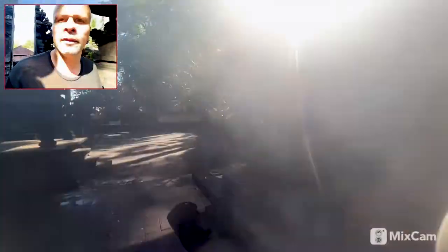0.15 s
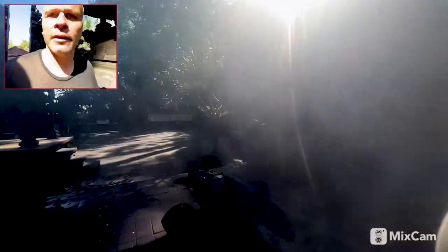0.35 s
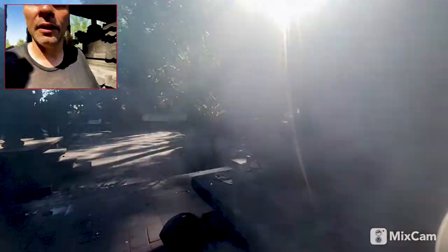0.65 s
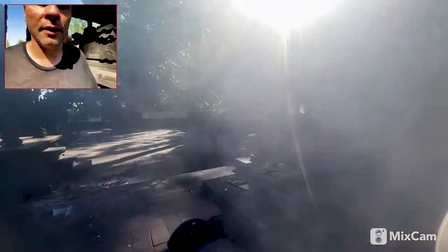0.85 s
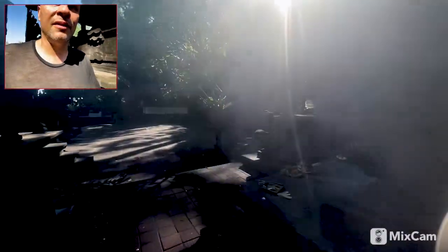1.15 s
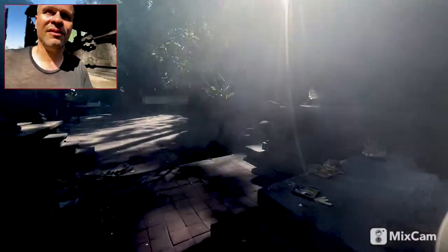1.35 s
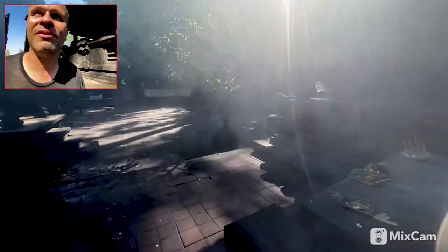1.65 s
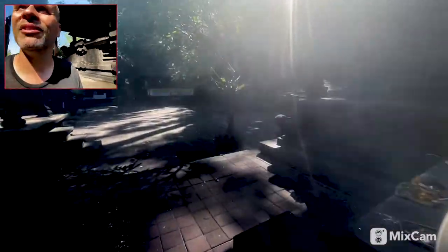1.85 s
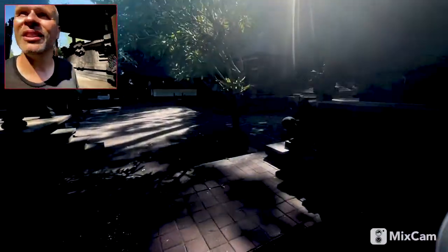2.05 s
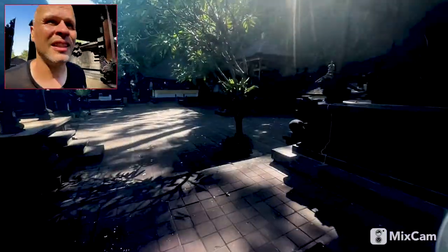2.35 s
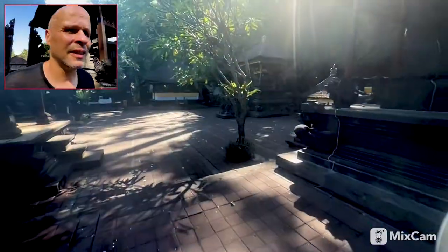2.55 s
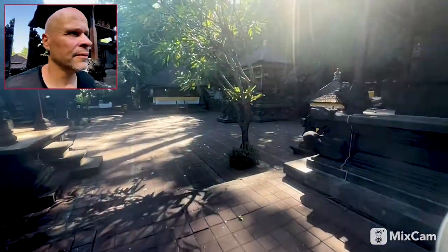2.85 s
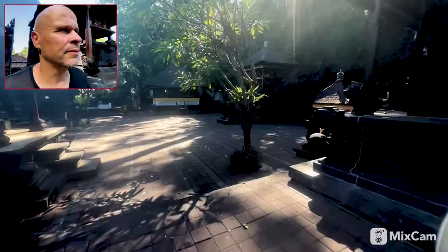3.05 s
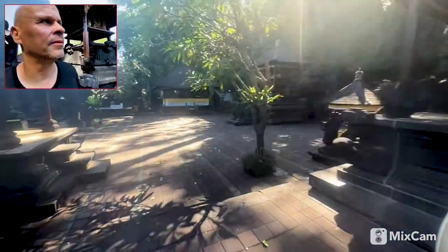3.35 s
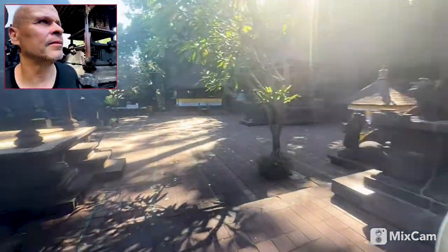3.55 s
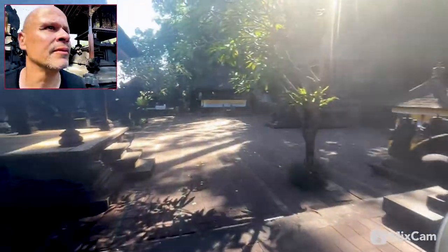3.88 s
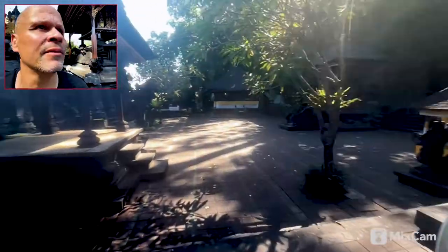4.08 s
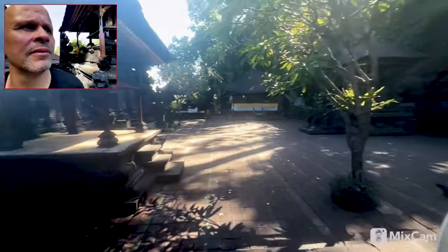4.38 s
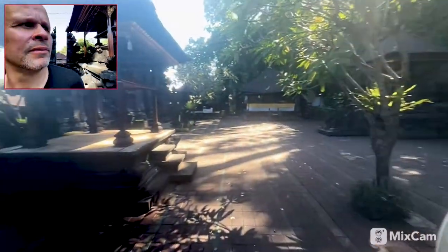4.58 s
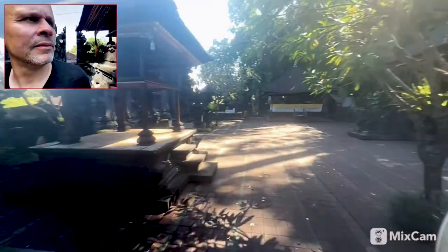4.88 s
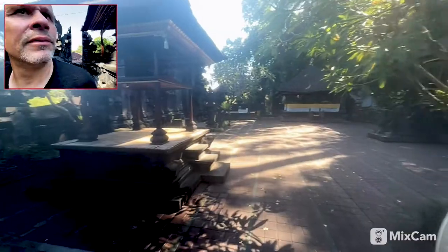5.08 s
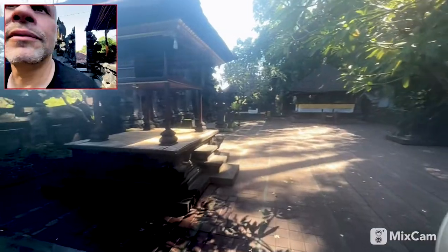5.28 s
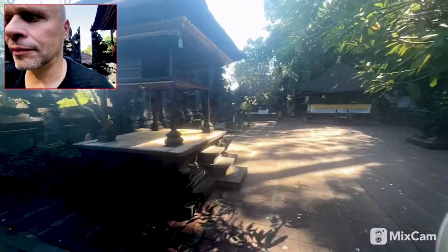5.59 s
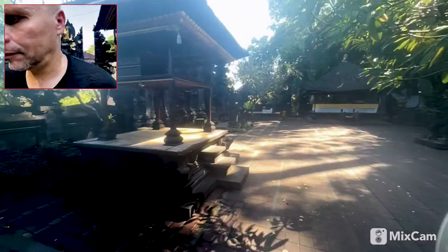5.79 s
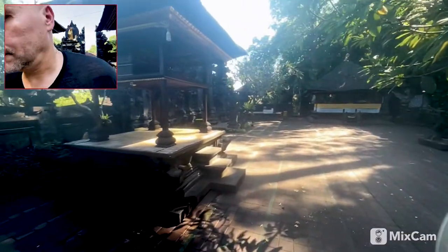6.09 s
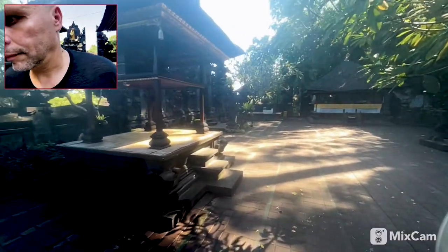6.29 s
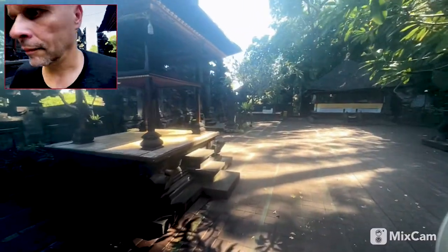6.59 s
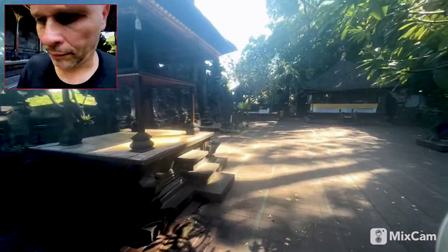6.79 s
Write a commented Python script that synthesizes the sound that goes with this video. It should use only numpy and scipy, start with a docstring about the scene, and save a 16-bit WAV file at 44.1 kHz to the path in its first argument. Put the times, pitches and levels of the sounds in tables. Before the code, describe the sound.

A large bat colony chirrs without pause inside a cave, heard in mono from the courtyard outside as a thin, shrill hiss. Small clusters of sliding squeaks stand out first, then harsh little screeches come more and more often as the colony swells, ringing briefly against the rock. A low wash of distant traffic lies below, with a faint motor drifting in and out and a far engine that drops to idle late on.

```python
"""A cave mouth beside a stone courtyard: thousands of tiny bat calls merge into a high sizzle. Nearer bats
squeak in gliding whistles and screech with a rasp, and the rock answers. A faint ringing whistle dies away at
the start. Over the rumble and wash of far traffic, a distant engine hums, then slows to idle, and a faint
higher drone swells in and out. Mono."""
import sys
import numpy as np
from scipy import signal
from scipy.fft import rfft, irfft, next_fast_len
from scipy.io import wavfile
from scipy.ndimage import map_coordinates

SR = 44100
rng = np.random.default_rng(int(sys.argv[2]) if len(sys.argv) > 2 else 0)


def file_out(sig):
    """Save sig as 16-bit WAV at sys.argv[1]."""
    # one column per channel
    cols = np.atleast_2d(sig).T
    # limit, then scale
    lim = np.clip(cols, -1, 1)
    pcm = np.round(lim * 32767).astype(np.int16)
    wavfile.write(sys.argv[1], SR, pcm)


N = 305613
TIME_S = np.arange(N) / SR


def amp(db):
    """Decibels to gain."""
    return 10 ** (np.asarray(db) / 20)


def unit(x):
    """Scale to rms 1."""
    return x / np.sqrt(np.mean(x ** 2) + 1e-20)


def at_hz(points, hz):
    """Interpolate (f/Hz, value) points on a log axis."""
    f, values = np.transpose(points)
    return np.interp(np.log(hz + 1), np.log(f + 1), values)


def curve(points):
    """Interpolate (t/s, value) points at every sample."""
    return np.interp(TIME_S, *np.transpose(points))


def wobble(knots_per_s, size=N):
    """Smooth random curve, rms near 1."""
    knots = rng.standard_normal(int(size * knots_per_s / SR) + 4)
    return map_coordinates(knots, [np.arange(size) * knots_per_s / SR])


def filtered(x, response):
    """Zero-phase filter with gain response(hz)."""
    size = next_fast_len(N + SR // 2)
    return irfft(rfft(x, size) * response(np.fft.rfftfreq(size, 1 / SR)), size)[:N]


def coloured(x, spectrum):
    """Shape x by (f/Hz, level/dB) points; rms 1."""
    return unit(filtered(x, lambda hz: amp(at_hz(spectrum, hz))))


def add(track, start_s, sound):
    """Mix a sound into a track."""
    part = track[max(0, round(start_s * SR)):][:len(sound)]
    part += sound[:len(part)]


def sine(hz):
    """Tone following a pitch curve."""
    return np.sin(2 * np.pi * np.cumsum(hz, axis=-1) / SR)


def call_envelope(length_s):
    """Flat top, cosine edges."""
    return signal.windows.tukey(round(length_s * SR), .45)


# Low traffic spectrum: f/Hz, relative level/dB
RUMBLE_SPECTRUM = [(20, -24), (30, -13), (40, 2.5), (60, 6.5), (90, 1.5), (125, -0.5), (200, -4.5),
                   (255, -5.5), (300, -4.5), (450, -10), (700, -19), (1500, -34)]
# Mid and high traffic spectrum: f/Hz, relative level/dB
WASH_SPECTRUM = [(250, -48), (550, 0), (900, 0.5), (1400, -1), (1700, -3), (2500, -3.5), (3300, -9.5),
                 (5000, -10), (9000, -10.5)]
def traffic(rumble_db=-43.5, wash_db=-48):
    """Far traffic: low rumble and a soft wash."""
    rumble = amp(rumble_db + 0.61 * wobble(5.5)) * coloured(rng.standard_normal(N), RUMBLE_SPECTRUM)
    wash = amp(wash_db) * coloured(rng.standard_normal(N), WASH_SPECTRUM)
    return rumble + wash


# Swells of the higher drone: t/s, peak level/dB
DRONE_SWELLS = [(1.35, -54.5), (2.28, -61), (3.45, -53.5)]
def drone(pitch_hz=290.7, floor_db=-63, half_width_s=0.22):
    """A faint wavering drone note comes and goes on the air."""
    swells = sum(amp(db) * np.exp(-((TIME_S - s) / half_width_s) ** 2) for s, db in DRONE_SWELLS)
    flutter = amp(1.9 * wobble(9))
    hz = pitch_hz * (1 + 0.0138 * wobble(30))
    return (amp(floor_db) + swells) * flutter * unit(sine(hz))


def background(dip_db=4.5, hold_s=0.43, rise_s=0.43):
    """The drone and traffic start quieter, then come up."""
    db = -dip_db * np.exp(-np.maximum(TIME_S - hold_s, 0) / rise_s)
    return amp(db) * (drone() + traffic())


# Engine loudness: t/s, level/dB
ENGINE_LEVEL = [(.45, -52), (.7, -44), (1.08, -36), (1.3, -36), (1.45, -41.5), (2.85, -43), (3.05, -38.5),
                (4.9, -40), (5.6, -46.5), (6.93, -45.5)]
# Exhaust orders: multiple of firing rate, relative level/dB
EXHAUST_ORDERS = [(1, 6.5), (1.5, -25), (2, -18), (3, -27.5)]
def engine(cruise_hz=79.47, creep_hz_per_s=0.62, idle_hz=61.6, ease_at_s=5.03, run_down_s=0.2943):
    """Cruises, then sinks to idle as the throttle closes; only low exhaust orders carry this far."""
    throttle = np.exp(-np.maximum(TIME_S - ease_at_s, 0) / run_down_s)
    loaded_hz = cruise_hz + creep_hz_per_s * TIME_S
    firing_hz = (idle_hz + throttle * (loaded_hz - idle_hz)) * (1 + 0.011 * wobble(14))
    exhaust = sum(amp(db + 1.8 * wobble(11)) * sine(order * firing_hz) for order, db in EXHAUST_ORDERS)
    return amp(curve(ENGINE_LEVEL)) * unit(exhaust)


# Whistle tones: f/Hz, relative level/dB
WHISTLE_TONES = [(2783, -11), (3085, -7), (3144, -7), (3768, -16)]
def whistle(level_db=-57, hold_s=0.14, fall_db_per_s=70):
    """A cluster of fluttering high tones holds briefly, then dies away."""
    envelope = amp(level_db - fall_db_per_s * np.maximum(TIME_S - hold_s, 0))
    tones = sum(amp(db + 1.7 * wobble(49)) * sine(hz + 18 * wobble(91)) for hz, db in WHISTLE_TONES)
    return envelope * unit(tones)


# Cave mouth decay: f/Hz, T60/s
CAVE_T60 = [(2000, 0.29), (7000, 0.39), (15000, 0.069)]
def cave_reverb(x, wet_db):
    """The rock adds a diffuse tail, shortest in the top treble."""
    hz, t, noise = signal.stft(rng.standard_normal(SR // 2), SR, nperseg=256)
    decay = amp(-60 * t / at_hz(CAVE_T60, hz)[:, None])
    _, tail = signal.istft(noise * decay, SR, nperseg=256)
    echo = signal.fftconvolve(x, tail / np.linalg.norm(tail))[:N]
    return (x + amp(wet_db) * echo) / np.hypot(1, amp(wet_db))


# Clear calls: t/s, length/s, start f/Hz, end f/Hz, level/dB
SQUEAK_CALLS = [ (0.585, 0.058, 4020, 2950, -51.5), (0.638, .055, 4130, 3710, -52.5),
                (1.197, .09, 7250, 6900, -55), (1.199, 0.048, 4850, 4500, -50.5),
                (1.26, .05, 5950, 5750, -53), (1.402, .064, 5220, 2315, -50), (1.438, .04, 4850, 4070, -48),
                (1.461, 0.04, 3100, 5000, -50), (1.598, .04, 7170, 3750, -43),
                (1.627, 0.032, 6700, 5100, -48), (2.578, .058, 4500, 4180, -56),
                (3.194, .1, 7150, 6590, -45), (3.203, 0.028, 8500, 8350, -47),
                (3.26, .048, 7700, 7550, -51), (3.424, 0.038, 4150, 3850, -42),
                (3.452, 0.031, 3350, 2750, -47.5), (3.485, .03, 3900, 4200, -42),
                (3.506, .025, 3470, 2800, -49), (4.78, .08, 4230, 3770, -56),
                (5.165, 0.071, 6040, 6150, -45), (5.285, 0.037, 7330, 7050, -42),
                (5.804, 0.065, 9400, 9100, -42), (5.8, .08, 5660, 5270, -52), (6.137, .02, 6150, 6120, -46),
                (6.685, .03, 2520, 2400, -55)]
def squeaks(glide_bend=1.7, quiver_hz=91, scratch_hz=229):
    """Near bats whistle: the pitch holds, then slides, with a scratchy quiver and a weak octave."""
    track = np.zeros(N)
    for start_s, length_s, start_hz, end_hz, db in SQUEAK_CALLS:
        envelope = call_envelope(length_s)
        size = len(envelope)
        age = np.linspace(0, 1, size)
        glide_hz = start_hz * (end_hz / start_hz) ** (age ** glide_bend)
        hz = glide_hz + quiver_hz * wobble(196.5, size) + scratch_hz * wobble(1816, size)
        flutter = amp(1.3 * wobble(320, size))
        voice = flutter * (sine(hz) + amp(-9) * sine(2 * hz))
        add(track, start_s, amp(db) * envelope * unit(voice))
    return cave_reverb(track, wet_db=-7)


# Harsh calls: t/s, length/s, f/Hz, fundamental level/dB, octave level/dB
SCREECH_CALLS = [ (1.17, 0.11, 6470, -53, -40), (3.188, 0.15, 7000, -50, -35.5),
                 (3.382, .15, 6670, -51, -32), (4.501, .08, 6600, -53, -31.5),
                 (4.673, 0.098, 6540, -51, -31.5), (5.278, .11, 6680, -49.5, -30.5),
                 (5.623, 0.051, 6220, -48, -31), (5.745, 0.052, 6450, -43, -27),
                 (5.805, .058, 6370, -47, -30), (5.892, 0.038, 6630, -50, -27),
                 (5.95, .036, 6650, -47, -27), (6.059, 0.033, 6650, -55, -22),
                 (6.133, .07, 6140, -55, -24.5), (6.191, 0.045, 6600, -51, -24),
                 (6.31, 0.051, 7350, -37.5, -37), (6.313, .063, 6130, -60, -24.5),
                 (6.46, .075, 6470, -67, -29), (6.473, 0.043, 8100, -39, -46),
                 (6.543, .024, 7100, -50, -27), (6.632, 0.031, 7050, -41.5, -31),
                 (6.842, 0.06, 8730, -41, -55)]
def screeches():
    """Squabbling bats: jittering pitch and a rasp, mostly strongest at the octave."""
    track = np.zeros(N)
    for start_s, length_s, pitch_hz, fundamental_db, octave_db in SCREECH_CALLS:
        envelope = call_envelope(length_s)
        size = len(envelope)
        hz = pitch_hz * (1 + 0.0179 * wobble(92.7, size) + 0.0715 * wobble(2600, size))
        rasp = amp(1.2 * wobble(595, size))
        fundamental = amp(fundamental_db) * unit(rasp * sine(hz))
        octave = amp(octave_db) * unit(rasp * sine(2 * hz))
        add(track, start_s, envelope * (fundamental + octave))
    return cave_reverb(track, wet_db=-1)


def chirps(low_hz, high_hz, mean_length_s, max_fall, spread_db, count):
    """Tiny falling calls at random times, pitches and distances."""
    onset, pitch, span, glide = rng.random((count, 4)).T[:, :, None]
    gain = amp(spread_db * np.clip(rng.standard_normal((count, 1)), -2, 2))
    step = np.arange(int(1.5 * mean_length_s * SR))
    age = np.minimum(step / (mean_length_s * SR * (.5 + span)), 1)
    centre_hz = low_hz + (high_hz - low_hz) * pitch
    hz = centre_hz * (1 - max_fall * glide * (age - .5))
    calls = gain * np.sin(np.pi * age) * sine(hz)
    positions = (onset * N).astype(int) + step
    return np.bincount(positions.ravel(), calls.ravel(), N)[:N]  # overlap-add


# Colony activity: t/s, level/dB
COLONY_LEVEL = [(0, -40.5), (.48, -40.5), (1.15, -35), (1.5, -38), (1.66, -36), (2.1, -37.5), (3.15, -37.8),
                (3.62, -36), (3.78, -34), (4.7, -33.5), (5.55, -32.5), (5.83, -29), (6.15, -30.5),
                (6.5, -29.5), (6.72, -31.5), (6.93, -29.5)]
# High chirr spectrum: f/Hz, relative level/dB
CHIRR_SPECTRUM = [(4000, -41.5), (7000, -17), (8500, -16.5), (10000, -9), (11500, -2.5), (12500, 1),
                  (13700, -0.5), (14700, -1), (15800, -11.5)]
# Lower chatter spectrum: f/Hz, relative level/dB
CHATTER_SPECTRUM = [(2500, -15.5), (4000, -11), (5500, -6.5), (7000, -5.5), (8500, -1.5), (11000, 3.5),
                    (15000, -43)]
def colony(chirr_gain_db=0.5, chatter_gain_db=-13):
    """Calls from deep inside blur into a hiss; single twitters from the entrance stand out."""
    twitters = chirps(7000, 17000, mean_length_s=0.0184, max_fall=0.086, spread_db=4, count=3600)
    chirr = coloured(rng.standard_normal(N) + amp(-10) * unit(twitters), CHIRR_SPECTRUM)
    peeps = chirps(5000, 11000, mean_length_s=0.0364, max_fall=0.059, spread_db=2.5, count=1400)
    chatter = coloured(rng.standard_normal(N) + amp(-7) * unit(peeps), CHATTER_SPECTRUM)
    voices = amp(chirr_gain_db + 0.54 * wobble(25)) * chirr + amp(chatter_gain_db) * chatter
    return amp(curve(COLONY_LEVEL)) * voices


def scene():
    """Mono mix on both channels."""
    mono = colony() + squeaks() + screeches() + whistle() + engine() + background()
    return np.array([mono, mono])


def record(dry):
    """Brick-wall low-pass."""
    cutoff_hz = 15780
    return np.array([filtered(channel, lambda hz: hz < cutoff_hz) for channel in dry])


dry = scene()
out = record(dry)
file_out(out)
```